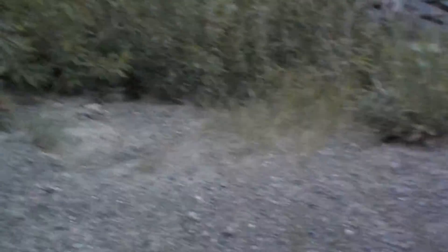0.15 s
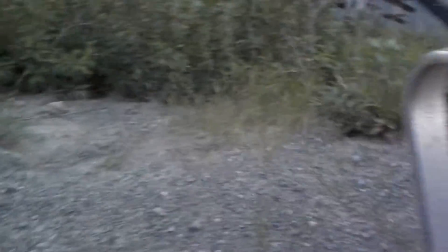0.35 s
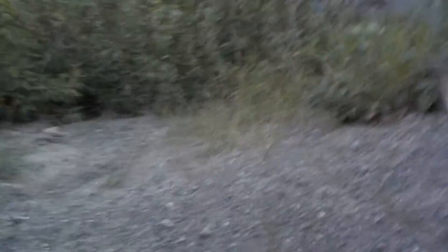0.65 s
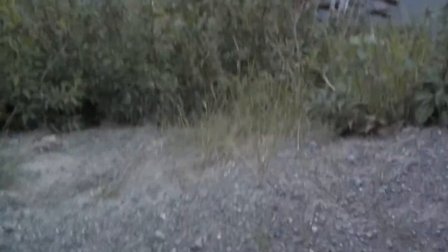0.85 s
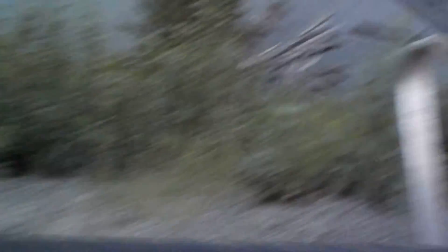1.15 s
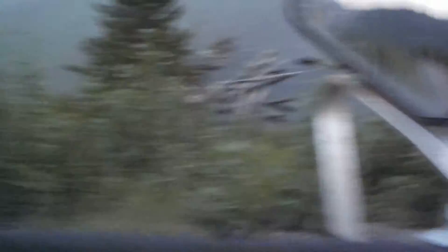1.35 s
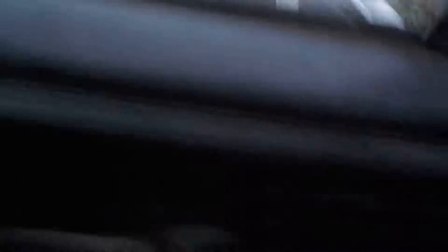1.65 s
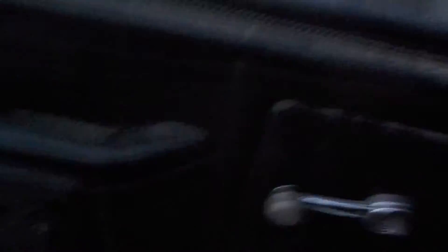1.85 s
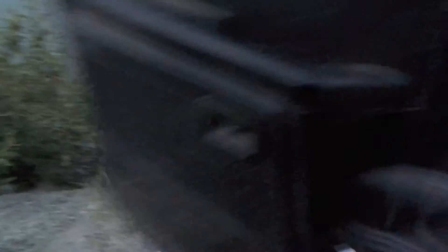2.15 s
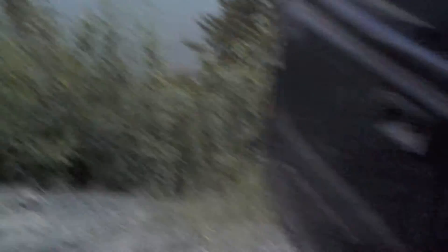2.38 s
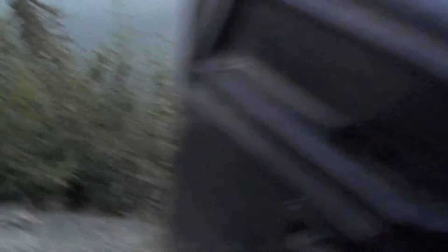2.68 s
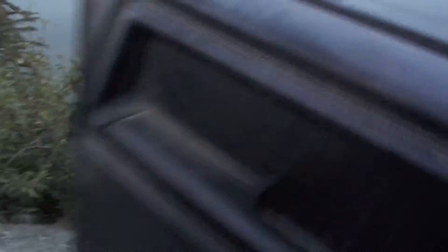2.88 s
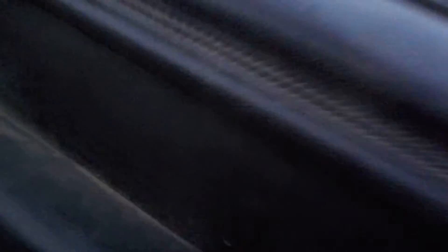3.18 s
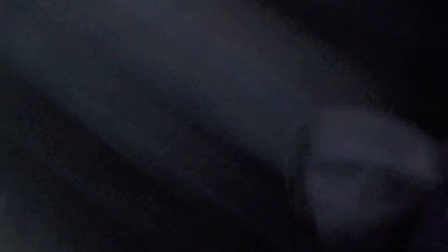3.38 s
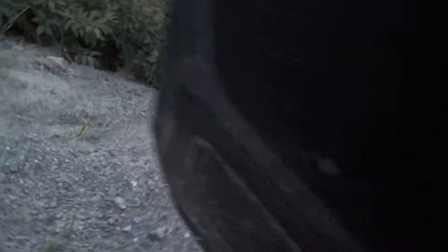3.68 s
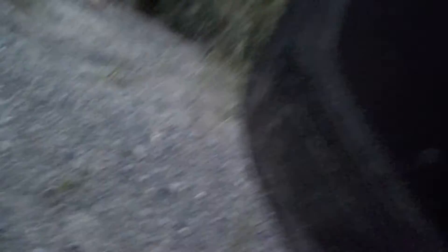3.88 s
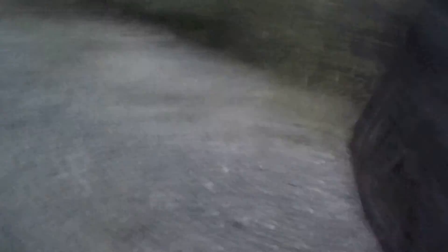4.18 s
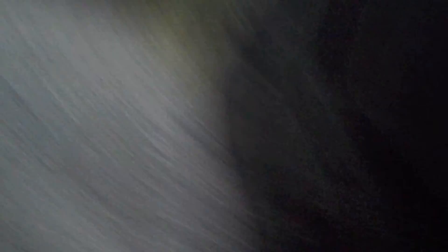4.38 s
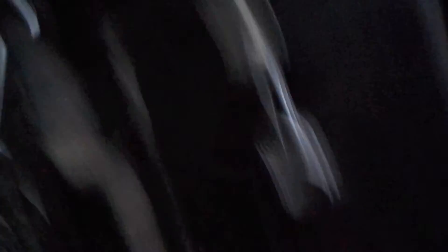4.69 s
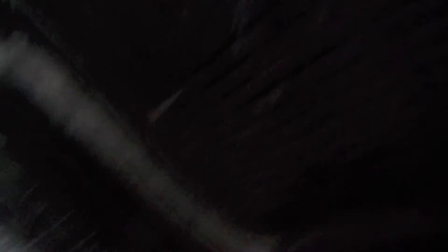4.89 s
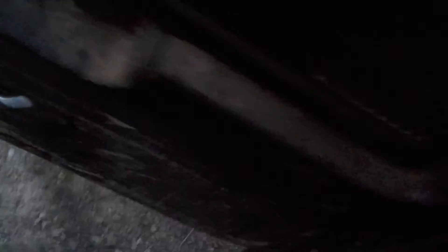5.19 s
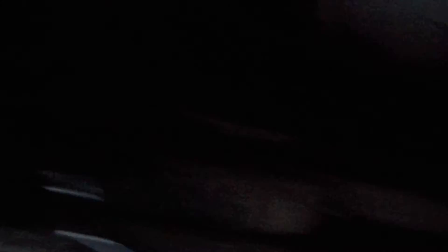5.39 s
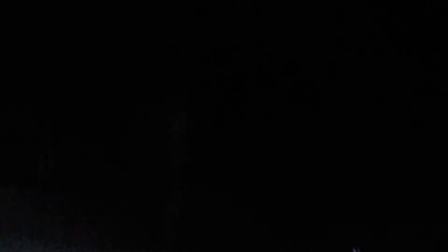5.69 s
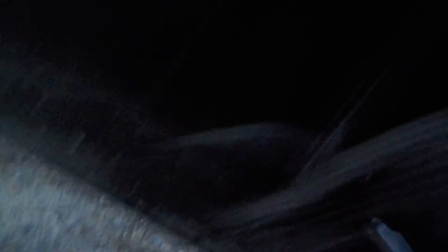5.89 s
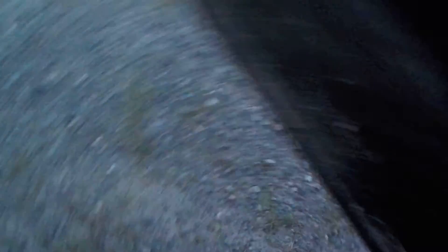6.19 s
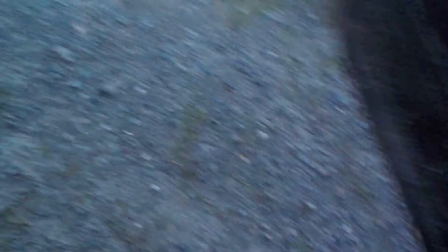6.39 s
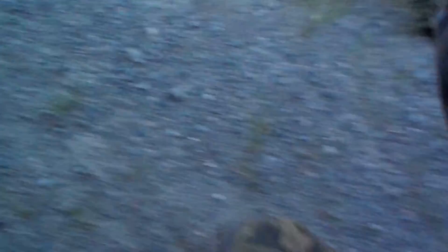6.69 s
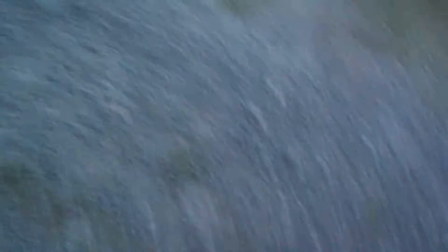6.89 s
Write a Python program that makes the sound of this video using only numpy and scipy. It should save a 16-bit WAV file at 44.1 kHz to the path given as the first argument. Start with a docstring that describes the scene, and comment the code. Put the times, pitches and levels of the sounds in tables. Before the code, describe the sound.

Dry, close outdoor sound on gravel, with faint hiss and a soft engine idle. Light knocks and a tiny squeak come at 0.4 and 0.8 s, then a bright latch clack and chirp at 0.94 and a firm, hollow door thump around 1.07. A small electric pump starts at once, a steady, dense buzzing whine. From 1.5 to 1.75 fingers rub and click on the camera; shoes and cloth shuffle until 2.5. A dull bump lands at 3.1, then stronger gravel scuffs, rustle and rough chirps from 3.4 to 4. At 4.3-4.7 a cluster of knocks and hollow taps ends in a low falling squeak. The uneven exhaust throb now emerges, strongest near 5.8, with airy puffs. Sharp ticks hit at 5.3, 5.6, 5.8 and 6.5. A thin pulsing whistle rises towards 6.8, amid final finger rubs and clicks by 7 s.

```python
"""Gravel lay-by: a car idles while someone with a hand-held camera opens a door and moves along its side.
Latch and door are shaped noise bursts coloured by panel resonances; a small electric pump whines as a stack of lines.
Uneven pulses through pipe resonances make the exhaust throb, which grows as the tail comes near.
Shoes, clothes and fingers on the camera are clouds of tiny contacts; taps, squeaks and a whistle are tones."""
import sys
import numpy as np
from scipy import signal
from scipy.fft import rfft, irfft, next_fast_len
from scipy.io import wavfile

SR = 44100
rng = np.random.default_rng(int(sys.argv[2]) if len(sys.argv) > 2 else 0)


def int16_out(signal):
    """Quantize to a 16-bit WAV file."""
    q = np.round(np.clip(np.atleast_2d(signal).T, -1, 1) * 32767)
    wavfile.write(sys.argv[1], SR, q.astype(np.int16))


N = 310905
TIME_S = np.arange(N) / SR

# faint hiss of the microphones
HISS_DB = -62.5

# dull bumps: t/s, relative level/dB
BUMPS = [(1.079, -27), (3.106, -41), (5.495, -30.5)]

# squeaks and chirps: middle t/s, length/s, first f/Hz, last f/Hz, level/dB, pitch roughness/share
SQUEAKS = [(0.374, 0.06, 3000, 3000, -37, 0.0042), (0.96, 0.058, 3900, 3470, -25, 0.049),
           (1.15, 0.13, 4360, 4230, -35, 0.025), (1.334, 0.11, 4300, 4220, -39, 0.022),
           (2.408, 0.023, 3950, 3800, -34, 0.025), (3.603, 0.067, 3890, 4700, -30, 0.08),
           (3.673, 0.045, 3000, 2880, -26.5, 0.035), (3.902, 0.13, 4950, 3550, -33, 0.062),
           (3.97, .09, 1900, 2270, -22.5, 0.047), (4.658, 0.15, 626, 394, -29, 0.072)]

# hollow ticks and tocks of trim and stones: t/s, relative level/dB, f/Hz, t60/s
TAPS = [(0.799, -21.5, 765, 0.069), (1.0772, -10, 910, 0.035), (1.083, -20.5, 544, 0.11),
        (1.266, -22, 1080, 0.12), (1.862, -24, 2790, 0.027), (2.812, -26, 1250, 0.027),
        (4.12, -30, 1216, 0.12), (4.264, -23, 1280, 0.02), (4.375, -17, 1448, 0.12),
        (4.535, -13.5, 862, 0.044), (5.3075, -4.5, 1390, 0.0095), (5.449, -26, 1100, 0.04),
        (5.5783, -12, 1150, 0.0072), (5.7877, -11.5, 1340, 0.02), (6.092, -27, 800, 0.039),
        (6.469, -14.5, 1050, 0.018), (6.804, -21.5, 1390, 0.052)]

# hard snaps of latch and fingernail: t/s, relative level/dB
SNAPS = [(0.9403, -15), (1.0546, -21), (1.0787, -16), (1.5488, -25), (1.632, -26), (1.683, -27),
         (1.711, -22.5), (1.7383, -17.5), (2.141, -35), (2.933, -26), (4.057, -29), (4.796, -27),
         (5.318, -24), (5.505, -28.5), (6.919, -29), (6.997, -25)]

# knocks on the car: t/s, relative levels of body/dB, clack/dB, rattle/dB, t60/s
KNOCKS = [(0.4218, -29, -31, -37, 0.15), (0.7411, -34.5, -50, -58, 0.18), (0.796, -29.5, -30.5, -47, 0.18),
          (0.9387, -23.5, -17, -27, 0.13), (1.0524, -26, -19.5, -28.5, 0.13),
          (1.0718, -11, -19.5, -36, 0.13), (1.125, -43, -33.5, -54, 0.37), (1.263, -28, -32.5, -42.5, 0.22),
          (2.259, -27, -25.5, -41, 0.1), (2.285, -33.5, -32, -43, 0.23), (2.934, -50, -26, -35.5, 0.13),
          (2.961, -33, -27.5, -47, 0.097), (3.106, -20, -24, -74, 0.16), (4.368, -27.5, -23, -35.5, 0.12),
          (4.412, -38, -26, -46, 0.37), (4.521, -22, -12, -36, 0.036), (4.5327, -15.5, -32, -33, 0.041),
          (4.553, -29, -23, -40, 0.11), (4.655, -27.5, -23, -44, 0.12), (5.302, -25, -22.5, -31.5, 0.11),
          (6.207, -32, -29.5, -36, 0.12)]
# panel resonances: f/Hz, width/Hz, relative level/dB
PANEL = [(177, 26, -10), (324, 23, -10), (564, 44, 4), (693, 95, 3.5), (937, 42, -5), (1271, 28, 1.5),
         (1645, 620, 1), (2160, 37, 4.5), (3050, 880, 2), (4200, 530, 7.5), (4790, 460, 7)]
SIZZLE_DB, SIZZLE_BAND_HZ = -8, (8600, 13800)   # top of each rattle, gain on its force

# fingers on the camera: t/s, length/s, mid-stroke relative level/dB, pressure growth/dB, release/s
RUBS = [(1.549, 0.012, -24.5, -7, 0.052), (1.594, 0.12, -25, 7, 0.023), (2.921, 0.018, -31, 2, 0.016),
        (2.994, 0.028, -34.5, 4, 0.038), (5.503, 0.023, -29, -9, .02), (6.831, 0.085, -27.5, 6.5, 0.029),
        (6.959, 0.04, -30.5, 14.5, 0.044)]
# rub spectrum: f/Hz, relative level per Hz/dB
RUB_SPECTRUM = [(300, -38), (900, -15), (1700, -5), (2300, 6.5), (2900, 4), (4200, -7), (6300, -18),
                (10000, -27.5), (15500, -34)]
RUB_ATTACK_SHARE, RUB_PAN_DB = 0.45, -2.5   # share of stroke building up; left minus right

# steps and shifts of weight: t/s, length/s, shoes on gravel level/dB, clothes level/dB
SCUFFS = [(0.487, 0.34, -44.5, -55), (1.917, 0.56, -43, -48.5), (2.95, 0.48, -44.5, -42),
          (3.359, 0.14, -37.5, -34), (3.517, 0.15, -34.5, -34.5), (3.68, 0.46, -34, -36.5),
          (4.206, 0.64, -32.5, -39), (5.349, 0.23, -35, -43.5), (5.84, 0.18, -35.5, -37.5),
          (6.11, 0.08, -34, -39)]
# gravel spectrum: f/Hz, relative level per Hz/dB
GRAVEL_SPECTRUM = [(120, 9), (330, -16.5), (600, 1.5), (1300, 5.5), (2100, 0.5), (3000, -5), (4500, -28)]
# cloth spectrum: f/Hz, relative level per Hz/dB
CLOTH_SPECTRUM = [(1200, 17), (2200, 13.5), (3400, 4.5), (4500, 12), (6300, -6), (9000, -13), (14000, -11)]
SCUFF_ATTACK_S, SCUFF_RELEASE_S = 0.047, 0.087
STIR_GRAVEL_DB, STIR_CLOTH_DB = -44, -54   # between steps
# clothes reflected off the car's side: median delay, log spread of delay, gain
REFLECTION_S, REFLECTION_SWING, REFLECTION_GAIN = .0011, .25, .6

# whistle that carries only towards the tail: t/s, level at full swell/dB
WHISTLE_LEVEL = [(4.6, -47), (5.0, -43), (5.75, -37), (6.6, -33.5), (6.8, -29.5), (7.05, -35)]
WHISTLE_HZ, WHISTLE_SWING_HZ, WHISTLE_PEAK_S = 965, 13, 6.32

# pump rotation: t/s, speed/(turns per s)
PUMP_SPEED = [(4.3, 187.6), (5.0, 187.0), (5.7, 187.0), (6.1, 186.2)]
# pump as the camera passes it and rounds the tail: t/s, level/dB
PUMP_LEVEL = [(1.8, -41), (3.3, -41.5), (4.4, -43.5), (5.0, -36.5), (5.9, -38), (6.4, -44.5)]
# outline of the pump's lines: multiple of speed, relative level/dB
PUMP_TONE = [(8, -1), (9, -10), (10, 4), (11, 1), (13, -12), (20, -11), (23, -2), (24, -4.5), (25, -3.5),
             (26, -13), (28, -6.5), (31, -14), (33, -7.5), (34, -17)]
PUMP_ON_S, PUMP_RISE_S = 1.11, 0.063   # starts as the door shuts

# engine as heard from the camera: t/s, exhaust level/dB, mechanical noise level/dB
ENGINE = [(0, -76, -45.5), (2.2, -76, -40), (3.2, -68, -38.5), (4.3, -49.5, -37.5), (5.1, -50, -34),
          (5.8, -44, -33), (6.4, -48, -36), (7.05, -51, -35.5)]
# six firings of one cycle: relative strength/dB, lateness/firing intervals
CYLINDERS = [(-15, 0), (0, .2), (-14, 0), (-2.5, .05), (-17, 0), (-4, .4)]
# exhaust pipe resonances: f/Hz, width/Hz, relative level/dB
PIPE = [(107.6, 9, 0), (223, 34, 0), (620, 10, 6)]
# mechanical noise spectrum: f/Hz, relative level per Hz/dB
ENGINE_SPECTRUM = [(30, -38), (65, -24), (110, -12), (350, -7.5), (600, -1), (1000, -1), (1950, 2),
                   (2800, -17), (4400, -12), (6200, -20.5), (7500, -36.5), (11000, -27.5), (15500, -34)]
CYCLE_HZ = 7.17   # mean
PUFF_DB, PUFF_BAND_HZ = 3, (780, 1570)   # gas leaving the tailpipe, level over the pipe's note

# microphone pair, stereo width: f/Hz, side minus mid level/dB
WIDTH = [(50, -24), (150, -20), (1000, -26), (1700, -23), (2400, -3), (3600, -13), (6000, -10), (10000, -1)]
# microphone pair, outline of left-right tilt, scaled in record(): f/Hz, level/dB
TILT = [(200, 1.5), (1700, -0.5), (2280, -7), (2750, 10), (3600, 2), (4300, 4.5), (6800, 1), (10000, 4.5)]
# camera's notch filters: f/Hz, width/Hz
NOTCHES = [(1770, 230), (2540, 450), (4965, 190), (7350, 1700), (8200, 1500)]
CUTOFF_HZ = 16000


def from_db(db):
    """Decibels to gain."""
    return 10 ** (np.asarray(db) / 20)


def rms_one(x):
    """Scale to rms 1."""
    return x / np.sqrt(np.mean(x ** 2) + 1e-20)


def in_time(rows):
    """Each column of a curve at every sample."""
    t_s, *columns = np.transpose(rows)
    return [np.interp(TIME_S, t_s, column) for column in columns]


def colour(x, points, share=1):
    """Shape x by share times a (Hz, dB) spectrum, linear in dB over log frequency."""
    size = next_fast_len(N, True)
    hz, db = np.transpose(points)
    freqs_hz = np.maximum(np.arange(size // 2 + 1) * SR / size, 1)
    gain = from_db(share * np.interp(np.log(freqs_hz), np.log(hz), db))
    return irfft(rfft(x, size) * gain, size)[..., :N]


def drift(rate_hz):
    """Random walk-about through rate_hz independent knots a second; rms 1."""
    knots = rng.standard_normal(4096)
    return rms_one(np.interp(TIME_S * rate_hz, np.arange(len(knots)), knots))


def band(x, low_hz, high_hz, order=2):
    """Causal band-pass."""
    edges_hz = [low_hz, min(high_hz, .45 * SR)]
    sos = signal.butter(order, edges_hz, "band", fs=SR, output="sos")
    return signal.sosfilt(sos, x + 1e-18)


def resonate(x, hz, width_hz):
    """Two-pole resonance, about unit gain at its peak."""
    r = np.exp(-np.pi * width_hz / SR)
    zeros = np.array([1, 0, -1]) * (1 - r * r) / 2
    poles = [1, -2 * r * np.cos(2 * np.pi * hz / SR), r * r]
    return signal.lfilter(zeros, poles, x + 1e-18)


def stereo(pair, wider_db=0):
    """Unrelated mid and side signals to left and right, the side weighted by WIDTH."""
    side = from_db(wider_db) * colour(pair[1], WIDTH)
    return np.array([pair[0] + side, pair[0] - side])


def grains(per_s, spread_db, clump_db, clump_rate_hz):
    """Two streams of tiny contacts of uneven size, in shared clumps."""
    sizes_db = spread_db * np.minimum(rng.exponential(1, (2, N)), 4)
    sizes = from_db(sizes_db) * rng.standard_normal((2, N))
    hits = rng.random((2, N)) < per_s / SR
    return sizes * hits * from_db(clump_db * drift(clump_rate_hz))


def patchy(x, low_hz, high_hz, depth_db, count):
    """Contacts shift, so each narrow band of a scuff flares on its own."""
    edges_hz = np.geomspace(low_hz, high_hz, count + 1)
    out = 0
    for k in range(count):
        flare = from_db(depth_db * drift(45))
        out = out + (-1) ** k * band(x, edges_hz[k], edges_hz[k + 1]) * flare
    return out


def stroke(start_s, length_s, attack_s, release_s):
    """Envelope of a sliding contact: it builds, holds and dies away."""
    age_s = TIME_S - start_s
    return np.clip(age_s / attack_s, 0, 1) * np.exp(-np.clip((age_s - length_s) / release_s, 0, 20))


def burst(start_s, t60_s, rise_s, tail_db, tail_t60_s):
    """Envelope of a blow: fast rise, fall, and a weaker, longer ring."""
    first = int(start_s * SR)
    age_s = TIME_S[:min(SR // 2, N - first)]
    fall = from_db(-60 * age_s / t60_s) + from_db(tail_db - 60 * age_s / tail_t60_s)
    return slice(first, first + len(age_s)), (1 - np.exp(-age_s / rise_s)) * fall


def hiss():
    """Faint, steady treble noise, independent in each channel."""
    return from_db(HISS_DB) * rms_one(band(rng.standard_normal((2, N)), 8800, 17000))


def bumps():
    """Heavy contacts boom briefly in the bass: enveloped noise, band-passed."""
    force = np.zeros(N)
    for start_s, db in BUMPS:
        span, shape = burst(start_s, t60_s=.13, rise_s=.004, tail_db=-18, tail_t60_s=.5)
        force[span] += from_db(db) * shape
    return 13 * band(force * rng.standard_normal(N), 150, 380, order=3)


def squeaks():
    """Each squeak is a more or less rough, gliding tone that swells and fades."""
    out = np.zeros(N)
    waver = drift(700)
    flutter = from_db(3 * drift(200) - 2)
    for middle_s, length_s, first_hz, last_hz, db, rough in SQUEAKS:
        span = np.flatnonzero(np.abs(TIME_S - middle_s) < length_s / 2)
        hz = np.linspace(first_hz, last_hz, len(span)) * (1 + rough * waver[span])
        tone = np.sin(2 * np.pi * np.cumsum(hz) / SR)
        out[span] += from_db(db) * np.hanning(len(span)) * flutter[span] * tone
    return out


def taps():
    """A small hard thing gives a short, hollow ring of three close pitches."""
    out = np.zeros(N)
    for start_s, db, hz, t60_s in TAPS:
        span, shape = burst(start_s, t60_s, rise_s=.0005, tail_db=-24, tail_t60_s=.07)
        angle = 2 * np.pi * hz * (TIME_S[span] - start_s)
        ring = 0
        for ratio, gain in [(.76, 0.61), (1, 0.95), (1.24, 0.64)]:
            ring = ring + gain * np.sin(ratio * angle + rng.uniform(0, 2 * np.pi))
        out[span] += from_db(db) * shape * ring
    return band(out, 400, 3500, order=3)


def snaps():
    """Hard contacts crack: very short noise bursts with treble and little bass."""
    force = np.zeros(N)
    for start_s, db in SNAPS:
        span, shape = burst(start_s, t60_s=.01, rise_s=.0002, tail_db=-21, tail_t60_s=.06)
        force[span] += from_db(db) * shape
    crack = band(force * rng.standard_normal((2, N)), 900, 3800, order=1)
    return 3.8 * stereo(band(crack, 350, CUTOFF_HZ), wider_db=4)


def knocks():
    """Each blow shakes a dull body, a clack and a bright rattle; panel resonances colour all three."""
    force = np.zeros((3, N))
    for start_s, *levels_db, t60_s in KNOCKS:
        span, shape = burst(start_s, t60_s, rise_s=.0008, tail_db=-16, tail_t60_s=4 * t60_s)
        force[:, span] += from_db(levels_db)[:, None] * shape
    blows = 0
    for push, (low_hz, high_hz) in zip(force, [(290, 1020), (780, 2300), (2600, 5480)]):
        noise = band(push * rng.standard_normal((2, N)), low_hz, high_hz, order=3)
        blows = blows + noise * np.sqrt(SR / 2 / (high_hz - low_hz))   # level independent of bandwidth
    rings = sum(from_db(db) * resonate(blows, hz, width_hz) for hz, width_hz, db in PANEL)
    sizzle = from_db(SIZZLE_DB) * band(force[-1] * rng.standard_normal((2, N)), *SIZZLE_BAND_HZ)
    return stereo(0.43 * blows + 0.65 * rings + sizzle)


def rubs():
    """Skin sticks and slips on the case: dense grains, heard differently at each microphone port."""
    pressure = 0
    for start_s, length_s, db, growth_db, release_s in RUBS:
        along = np.clip((TIME_S - start_s) / length_s, 0, 1) - .5
        envelope = stroke(start_s, length_s, RUB_ATTACK_SHARE * length_s, release_s)
        pressure = pressure + from_db(db + growth_db * along) * envelope
    slips = rms_one(colour(grains(16000, 1.2, 1, 400), RUB_SPECTRUM))
    pan = from_db(RUB_PAN_DB * np.array([[.5], [-.5]]))
    return pressure * stereo(slips, wider_db=6.5) * pan


def shuffle():
    """Stones grind under the shoes; cloth brushes in finer, brighter grains, its reflection path moving."""
    gravel_power, cloth_power = from_db(STIR_GRAVEL_DB) ** 2, from_db(STIR_CLOTH_DB) ** 2
    for start_s, length_s, gravel_db, cloth_db in SCUFFS:
        effort = stroke(start_s, length_s, SCUFF_ATTACK_S, SCUFF_RELEASE_S)
        gravel_power = gravel_power + (from_db(gravel_db) * effort) ** 2
        cloth_power = cloth_power + (from_db(cloth_db) * effort) ** 2
    gravel = patchy(grains(1800, 3, 1, 45), 200, 4000, depth_db=2.6, count=16)
    cloth = patchy(grains(6000, 2.8, 1.3, 40), 1500, 16000, depth_db=2.7, count=16)
    delay_s = REFLECTION_S * np.exp(REFLECTION_SWING * drift(7))
    reflected = np.array([np.interp(TIME_S - delay_s, TIME_S, channel) for channel in cloth])
    cloth = cloth + REFLECTION_GAIN * reflected
    gravel = stereo(rms_one(colour(gravel, GRAVEL_SPECTRUM)))
    cloth = stereo(rms_one(colour(cloth, CLOTH_SPECTRUM)))
    return np.sqrt(gravel_power) * gravel + np.sqrt(cloth_power) * cloth


def whistle():
    """Thin tone with an octave; once an engine cycle it swells and slides up, then sinks back."""
    level_db, = in_time(WHISTLE_LEVEL)
    cycle = 2 * np.pi * CYCLE_HZ * (TIME_S - WHISTLE_PEAK_S)
    swell = from_db(5.5 * (np.cos(cycle) - 1) + 2.5 * drift(40))
    hz = WHISTLE_HZ + WHISTLE_SWING_HZ * np.sin(cycle) + 10 * drift(90)
    angle = 2 * np.pi * np.cumsum(hz) / SR
    return from_db(level_db) * swell * (np.sin(angle) + 0.45 * np.sin(2 * angle))


def pump():
    """Small motor's buzz, a dense stack of lines; each swells and fades as the camera moves through echoes."""
    (speed_hz,), (level_db,) = in_time(PUMP_SPEED), in_time(PUMP_LEVEL)
    running = np.clip((TIME_S - PUMP_ON_S) / PUMP_RISE_S, 0, 1)
    angle = 2 * np.pi * np.cumsum(speed_hz * (1 + .0015 * drift(25))) / SR
    multiples, tone_db = np.transpose(PUMP_TONE)
    opposite = np.array([[1], [-1]])   # phase wander, left against right
    buzz = 0
    for multiple in np.arange(multiples[0], multiples[-1] + 1):
        phase = rng.uniform(0, 2 * np.pi) + 0.026 * multiple * drift(1.27) * opposite
        line_db = np.interp(multiple, multiples, tone_db) + 2.9 * drift(6)
        buzz = buzz + from_db(line_db) * np.sin(multiple * angle + phase)
    return running * from_db(level_db) * rms_one(buzz)


def engine():
    """Uneven firings ring the exhaust pipe, puff from its mouth and make the mechanical noise throb."""
    exhaust_db, noise_db = in_time(ENGINE)
    strength_db, late = np.transpose(CYLINDERS)
    firings = np.cumsum(len(CYLINDERS) * CYCLE_HZ * (1 + .003 * drift(3))) / SR
    number = np.arange(1, int(firings[-1]) - 1)
    cylinder = number % len(CYLINDERS)
    moments = np.searchsorted(firings, number + np.clip(late, -.5, .5)[cylinder])
    pulses = np.zeros(N)
    pulses[moments] = from_db(strength_db[cylinder] + 2 * rng.standard_normal(len(number)))
    exhaust = sum(from_db(db) * resonate(pulses, hz, width_hz) for hz, width_hz, db in PIPE)
    exhaust = resonate(exhaust, 228, 95)   # muffler rounds each pulse
    exhaust = from_db(exhaust_db) * rms_one(band(exhaust, 80, 1000, order=3))
    throb = rms_one(signal.lfilter([1], [1, -np.exp(-1 / (0.014 * SR))], pulses))   # 14 ms decay
    puffs = rms_one(band(throb * rng.standard_normal(N), *PUFF_BAND_HZ, order=3))
    puffs = from_db(exhaust_db + PUFF_DB) * puffs
    noise = rms_one(colour(rng.standard_normal((2, N)) * (1 + .3 * throb), ENGINE_SPECTRUM))
    return exhaust + puffs + from_db(noise_db) * stereo(noise)


def scene():
    """All sources summed dry: close to the camera, in the open air."""
    background = hiss() + bumps() + squeaks() + taps() + snaps()
    handling = knocks() + rubs() + shuffle()
    return background + handling + whistle() + pump() + engine()


def record(dry):
    """The two ports colour the sound differently; notches, rounded peaks and a cut top follow."""
    x = np.array([colour(dry[0], TILT, share=0.33), colour(dry[1], TILT, share=-0.34)])
    for hz, width_hz in NOTCHES:
        x = signal.lfilter(*signal.iirnotch(hz, hz / width_hz, fs=SR), x)
    rounded = x / (1 + x ** 6) ** (1 / 6)
    return signal.sosfilt(signal.ellip(10, .1, 90, CUTOFF_HZ, fs=SR, output="sos"), rounded)


dry = scene()
out = record(dry)
int16_out(out)
```